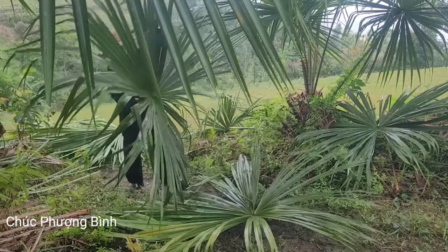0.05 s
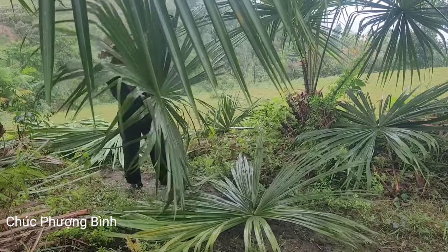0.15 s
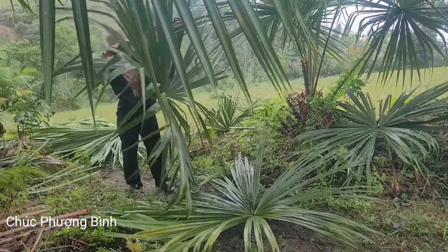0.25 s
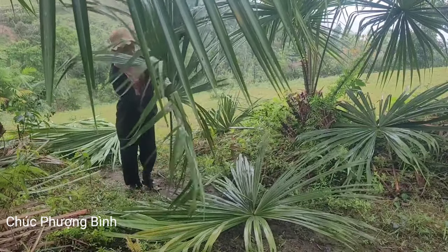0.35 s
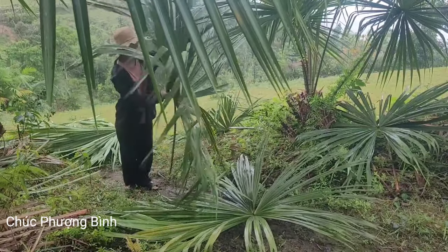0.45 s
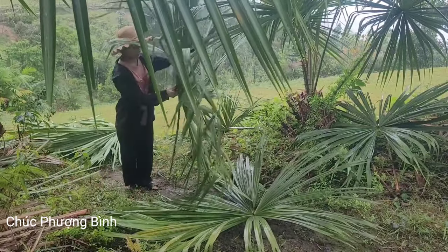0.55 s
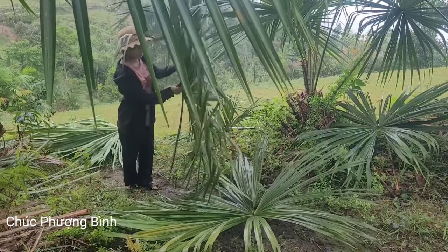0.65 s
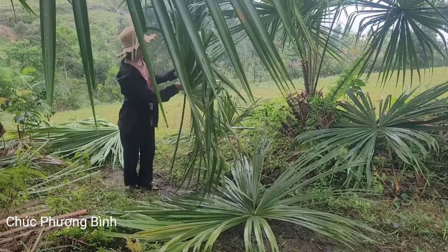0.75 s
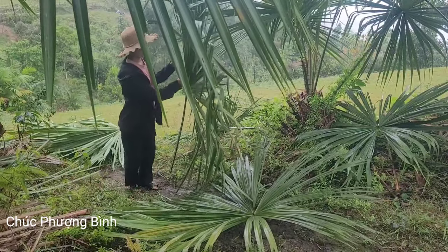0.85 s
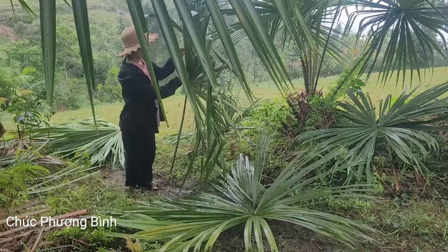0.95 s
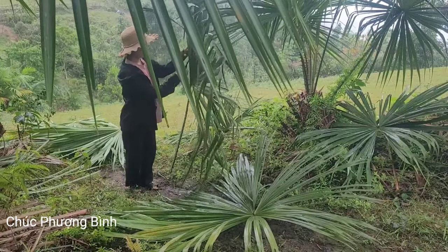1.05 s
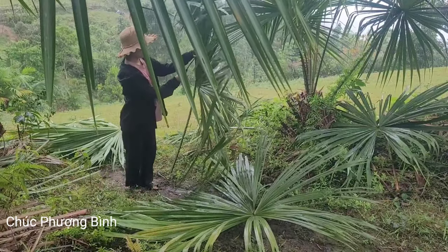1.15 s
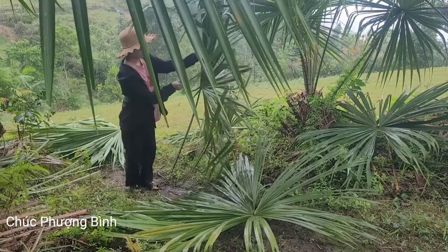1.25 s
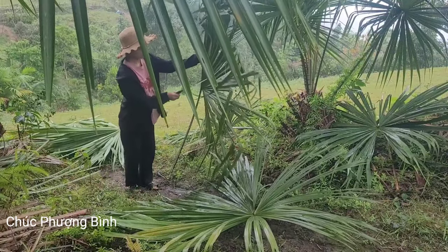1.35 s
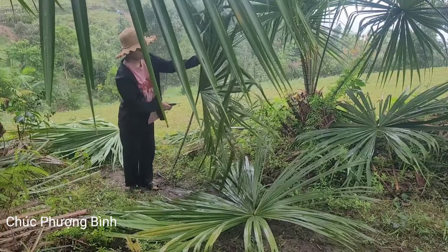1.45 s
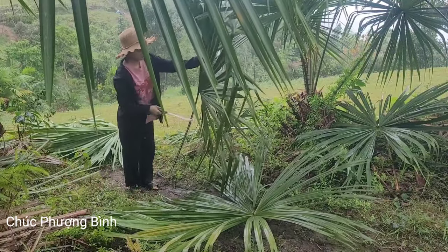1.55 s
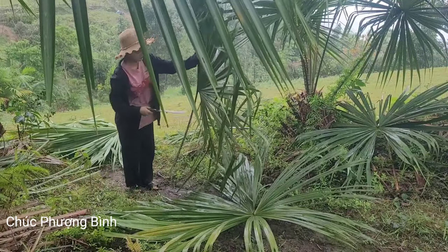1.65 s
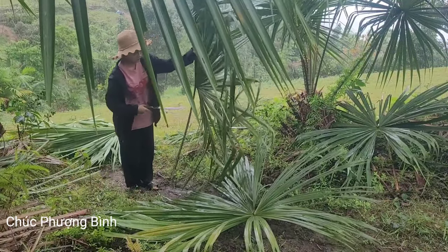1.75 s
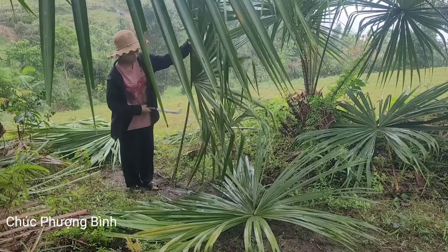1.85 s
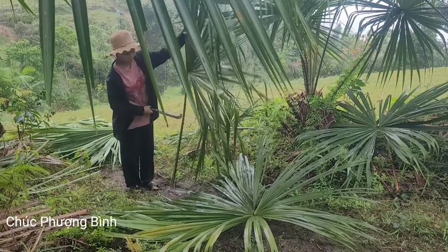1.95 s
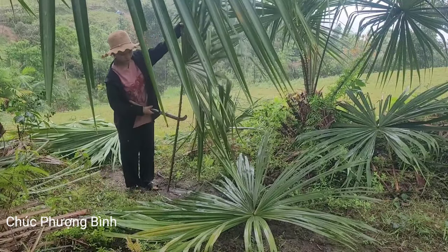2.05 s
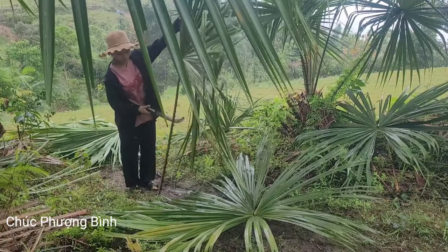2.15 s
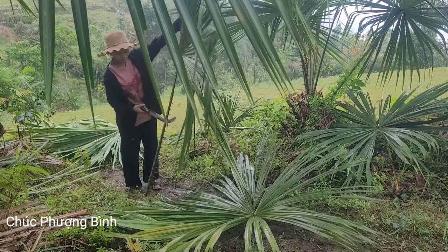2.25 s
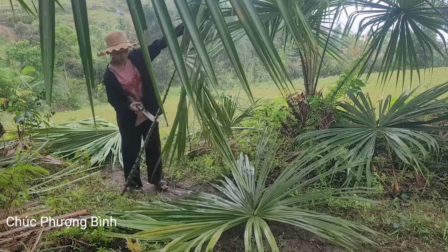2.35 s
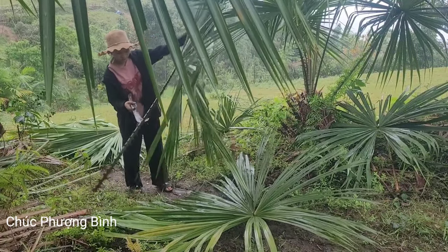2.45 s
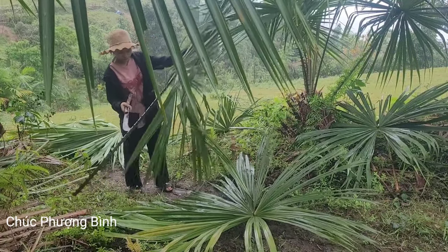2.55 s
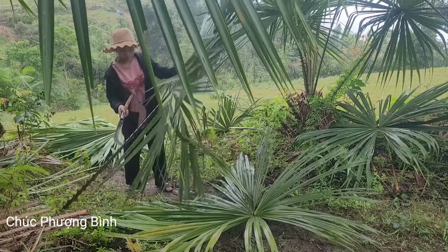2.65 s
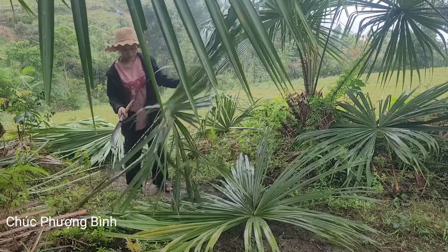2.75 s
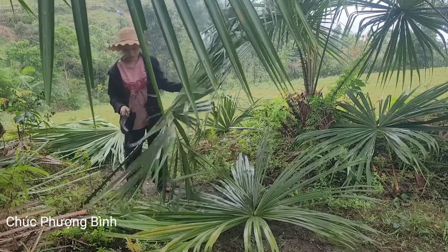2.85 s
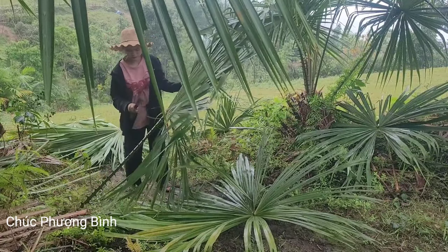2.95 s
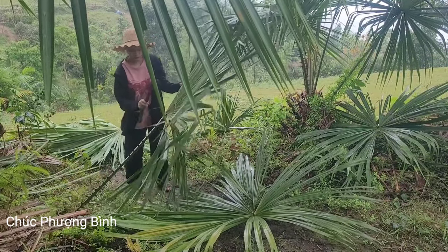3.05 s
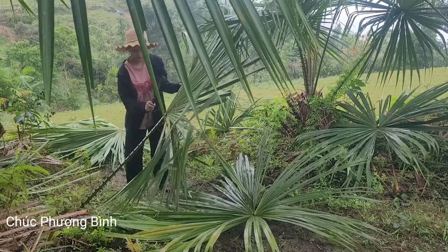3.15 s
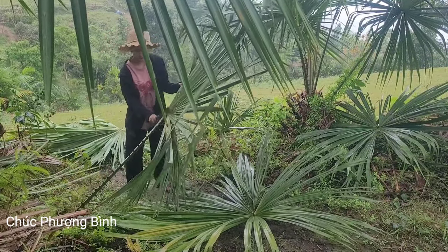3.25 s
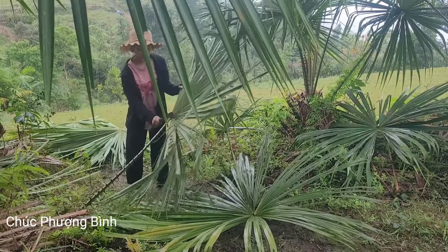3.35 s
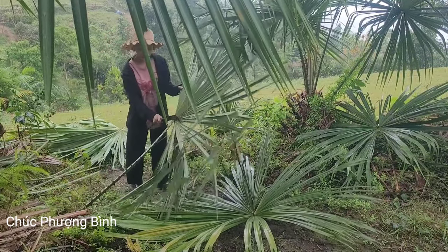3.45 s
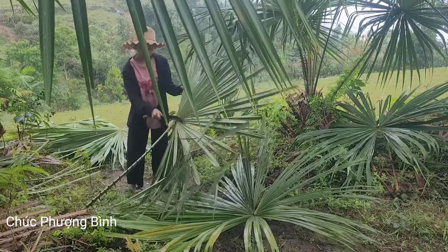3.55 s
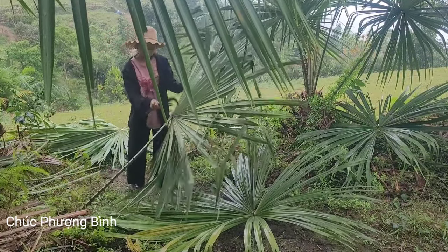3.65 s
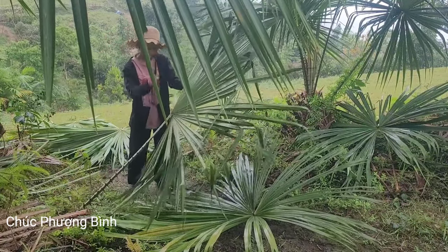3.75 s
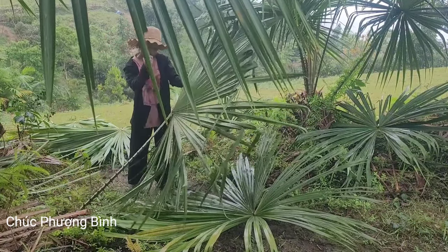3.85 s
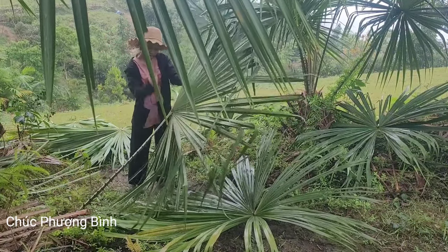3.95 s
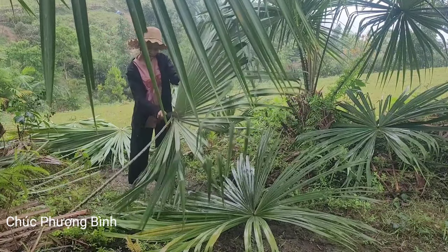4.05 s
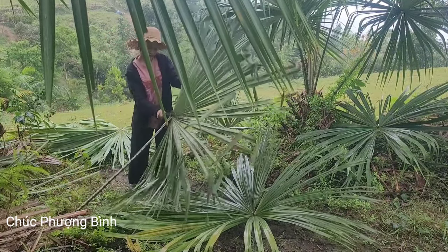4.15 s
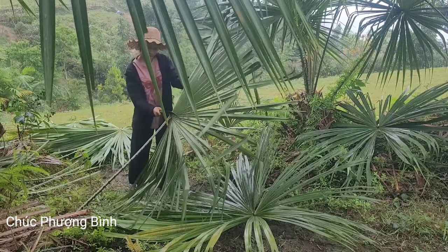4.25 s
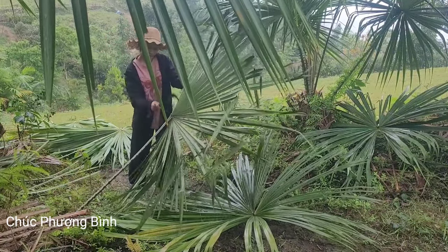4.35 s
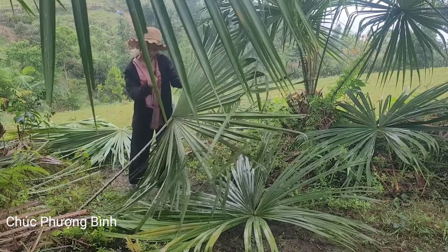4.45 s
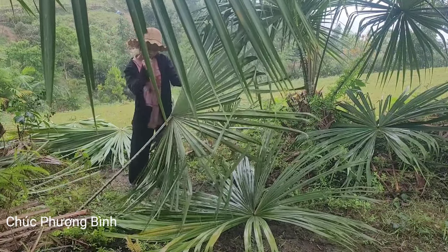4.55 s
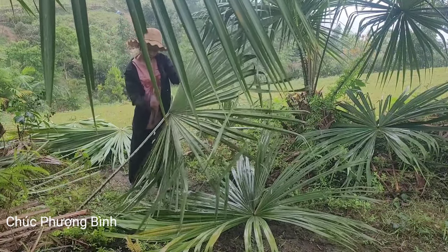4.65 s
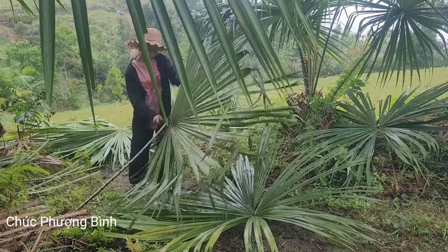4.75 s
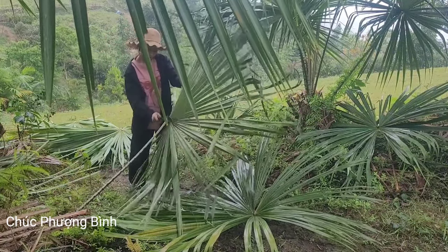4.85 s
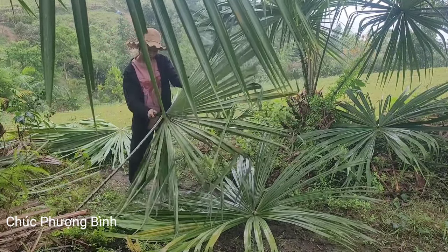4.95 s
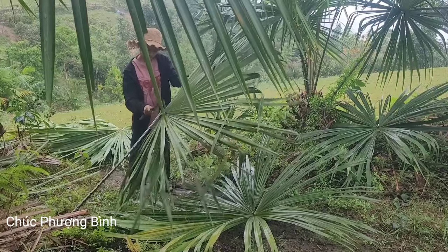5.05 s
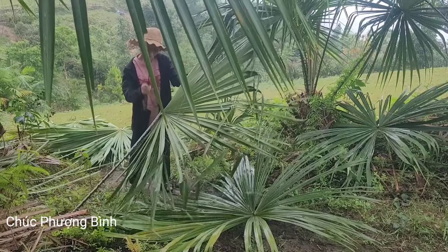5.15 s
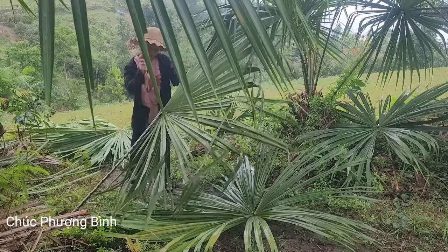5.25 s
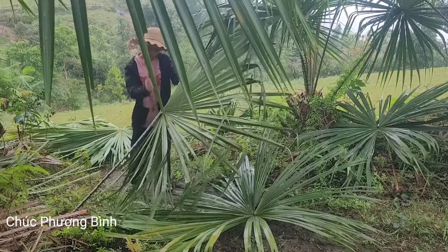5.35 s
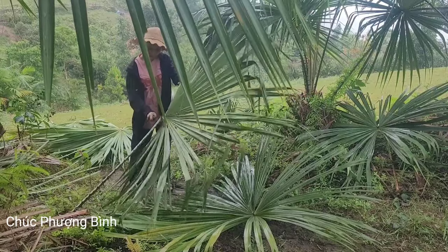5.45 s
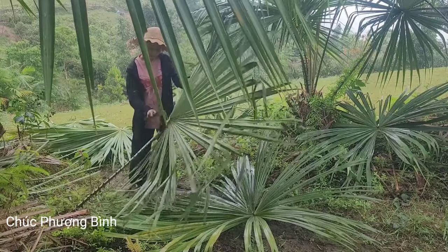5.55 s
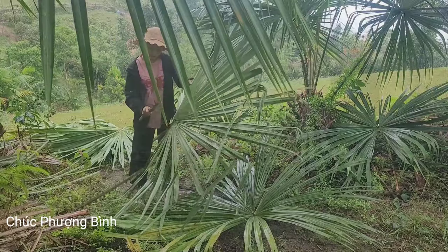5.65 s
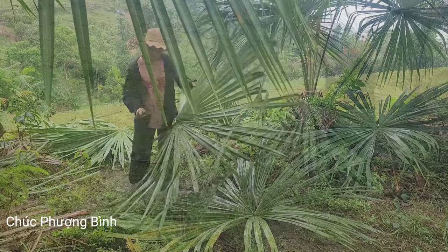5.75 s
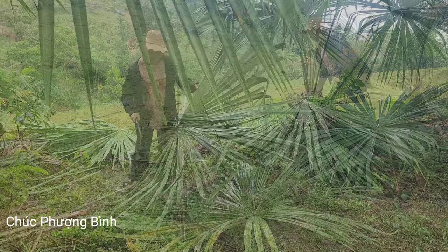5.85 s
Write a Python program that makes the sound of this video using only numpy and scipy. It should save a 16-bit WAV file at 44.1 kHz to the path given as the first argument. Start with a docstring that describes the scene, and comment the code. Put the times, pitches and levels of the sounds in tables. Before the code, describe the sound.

A close stereo outdoor scene in a grove, about six seconds long. A thin, steady hiss of distant insects and a very faint low wind run throughout. From 0.3 to 0.75 s stiff palm leaves slap lightly in a cluster, with tiny fibre ticks. Between 1 and 1.7 s come small dry stalk knocks and a swell of papery dragging, which then eases. Around 2.3-2.5 s a frond swishes quickly through the air with a bright hiss. At 2.8 s a crisp leafy slap and sharp snap lead into more rustling. A blade chops at 3.3 s, fairly lightly, with a rustle near 3.65 s, then hard and woody at 4.1 and 4.75 s, the latter with an immediate second knock. A softer, duller chop lands at 5.5 s. Leaves shiver after the blows, small ticks end near 5.8 s, and echoes are short and faint.

```python
"""Outdoors in a grove a blade chops stiff palm stalks; the big fronds slap, snap and rustle as they are handled.
Chops and knocks are short pushes and dying crackles that ring stalk, frond and leaves; fibres tick as they part.
Rustles are dense noise grains. A far insect chorus (narrow bands of hiss) and faint wind lie underneath.
Blows and leaves reach the left of two close microphone ports slightly first; the trees echo the blows."""
import sys
import numpy as np
from scipy import signal
from scipy.fft import rfft, irfft, next_fast_len
from scipy.io import wavfile
from scipy.ndimage import uniform_filter1d, map_coordinates

SR = 44100
rng = np.random.default_rng(int(sys.argv[2]) if len(sys.argv) > 2 else 0)


def output_pcm(signal):
    """Save a mono or channel-first signal as 16-bit PCM at the path in sys.argv[1].

    Samples are clipped to [-1, 1] before scaling.
    """
    pcm = np.clip(np.atleast_2d(signal).T, -1, 1) * 32767
    wavfile.write(sys.argv[1], SR, np.round(pcm).astype(np.int16))


N = 260631  # length in samples

# Blade blows: t/s, slap level/dB, thud level/dB, stalk level/dB, fizz level/dB,
# stalk f/Hz, frond f/Hz, stalk t60/s (time to fall by 60 dB)
BLADE_BLOWS = [(3.3262, -29, -32.5, -29, -27, 868, 375, .11),
               (4.0857, -19.5, -24.5, -15.5, -30.5, 710, 318, 0.12),
               (4.7486, -17.5, -26, -17.5, -23.5, 815, 200, 0.11),
               (5.482, -28.5, -31.5, -31.5, -28, 510, 264, 0.14)]
# Fronds knocking and slapping, and at 4.069 s the blade grazing leaves just before its blow: # t/s, slap
# level/dB, thud level/dB, stalk level/dB, fizz level/dB, stalk f/Hz, stalk t60/s
FROND_KNOCKS = [(0.2947, -45, -63, -47, -55, 520, 0.085), (0.5295, -34, -72, -41, -32.5, 553, 0.11),
                (0.5469, -30.5, -68, -56, -34.5, 576, 0.068), (0.5959, -40, -58, -51, -37, 1640, 0.067),
                (0.6144, -41.5, -65, -49.5, -42, 472, 0.086), (0.6603, -32.5, -72, -48, -36.5, 480, 0.059),
                (0.6726, -44, -69, -43.5, -47, 570, 0.094), (0.7464, -52, -66, -43.5, -54, 605, 0.091),
                (0.971, -39, -57, -36, -47.5, 674, 0.092), (1.187, -40, -73, -38, -46, 577, 0.075),
                (1.2104, -44, -55, -44, -51, 575, 0.053), (1.2481, -55, -58, -46.5, -51, 1550, 0.072),
                (1.3156, -40.5, -70, -55, -46.5, 510, 0.053), (1.3555, -49.5, -68, -47.5, -51, 1520, .09),
                (1.4246, -43, -53, -29.5, -60, 558, 0.069), (1.502, -39.5, -65, -39, -43.5, 1000, 0.067),
                (1.5764, -50, -57, -39.5, -48.5, 1410, 0.14), (1.6222, -42, -66, -45.5, -43.5, 1090, .12),
                (1.9794, -47.5, -85, -49.5, -49.5, 1730, .16), (2.1364, -52, -83, -39, -57, 1140, 0.06),
                (2.262, -37, -81, -47, -30.5, 584, 0.071), (2.277, -48, -65, -43.5, -52, 244, .15),
                (2.317, -64, -54, -49.5, -45, 626, .13), (2.724, -50, -61, -45, -50, 890, 0.13),
                (2.7934, -28.5, -48, -39, -22, 1390, 0.093), (2.818, -45, -47.5, -35.5, -52, 704, 0.086),
                (2.9885, -53, -53.5, -40.5, -52, 613, 0.081), (3.5029, -42, -60, -40.5, -42.5, 805, 0.067),
                (3.5776, -44, -70, -39.5, -53, 447, 0.0635), (3.677, -38, -70, -42.5, -47, 547, 0.087),
                (4.069, -38.5, -63, -46.5, -42, 860, 0.09), (4.134, -37.5, -38, -36.5, -38, 555, 0.24),
                (4.174, -53, -37.5, -50, -50, 480, 0.088), (4.2497, -39, -53, -44, -31.5, 950, 0.074),
                (4.2529, -62, -65, -36, -62, 940, 0.041), (4.337, -51, -74, -41.5, -49, 1150, 0.041),
                (4.3748, -41.5, -68, -52, -38.5, 1012, 0.07),
                (4.7675, -26.5, -29.5, -18.5, -28.5, 539, 0.069), (4.847, -63, -47, -42, -46, 1400, 0.049),
                (4.934, -53, -54, -41, -55, 514, .035), (5.0686, -57, -67, -51, -57, 600, .045),
                (5.1686, -47, -76, -51, -49.5, 1790, 0.062), (5.783, -55, -63, -44.5, -52, 700, 0.072),
                (5.8099, -44, -65, -51, -34, 1074, 0.067), (5.821, -48, -44.5, -46.5, -47, 610, 0.098)]

LEFT_LEADS_S = 2.9 / SR  # the left port hears blows and leaves this much earlier


def amp(db):
    """dB to gain."""
    return 10 ** (np.asarray(db) / 20)


def unit(x):
    """Scale to rms 1."""
    return x / np.sqrt(np.mean(x ** 2) + 1e-20)


def along(points, hz):
    """Read a curve of (f/Hz, value) points on a log frequency axis."""
    f, value = np.transpose(points)
    return np.interp(np.log(hz + 1), np.log(f + 1), value)


def curves(rows):
    """Give one value per sample for each column after the time."""
    s, *columns = np.transpose(rows)
    return [np.interp(np.arange(N) / SR, s, column) for column in columns]


def wobble(rate):
    """A smooth random curve with this many random points a second."""
    points = rng.standard_normal(int(N * rate / SR) + 4)
    return map_coordinates(points, [np.arange(N) * rate / SR])


def bump(centre_s, spread_s):
    """A bell-shaped swell that peaks at 1."""
    return np.exp(-.5 * ((np.arange(N) / SR - centre_s) / spread_s) ** 2)


def filtered(x, response):
    """Filter x by a response over frequency, scaled so that white noise keeps its rms."""
    n = x.shape[-1]
    m = next_fast_len(n + SR // 10)
    gain = response(np.fft.rfftfreq(m, 1 / SR))
    gain = gain / np.sqrt(np.mean(np.abs(gain) ** 2))
    return irfft(rfft(x, m) * gain, m)[..., :n]


def ringing(modes, order=1):
    """Resonances (f/Hz, width/Hz, level/dB) that ring after a push; order 2 passes the sound through twice."""
    def response(f):
        total = 0
        for k, (centre, width, db) in enumerate(modes):
            resonance = 1j * f * width / (centre ** 2 - f ** 2 + 1j * f * width)
            total = total + (-1) ** k * amp(db) * resonance
        return total ** order
    return response


def crackle(rate, spiky_db):
    """Two noises of rms 1 broken into the same grains: fibres give way in small uneven jerks."""
    grains = amp(spiky_db * wobble(rate))
    return unit(grains * rng.standard_normal((2, N)))


def ports(pair, likeness):
    """Two unrelated signals become left and right, as alike as the (f/Hz, likeness) curve, the right one late."""
    def response(hz):
        turn = np.arccos(np.clip(along(likeness, hz), -1, 1)) / 2
        return np.array([np.cos(turn), np.sin(turn)])

    def delay(hz):
        return np.exp(np.outer([1j, -1j], np.pi * LEFT_LEADS_S * hz))

    shared, apart = filtered(pair, response)
    return filtered(np.array([shared + apart, shared - apart]), delay) / np.sqrt(2)


def insects():
    """Many far singers blend into narrow bands of hiss that waver a little."""
    # Loudness of the chorus: t/s, level/dB
    chorus_level = [(0.0, -58), (1.61, -56.5), (1.86, -58), (2.42, -55.5), (5.91, -57.5)]
    # Bands the insects sing in: f/Hz, width/Hz, level/dB (before passing twice)
    song_bands = [(4170, 820, 0), (5150, 560, -4.5), (7440, 600, -4)]
    level_db, = curves(chorus_level)
    hiss = amp(level_db + 0.41 * wobble(4.36)) * crackle(55, spiky_db=1.5)
    return filtered(hiss, ringing(song_bands, order=2))


def wind():
    """A faint low buffeting in slow gusts, different at each port, over the air's steady rumble."""
    # Far rumble of the air: f/Hz, width/Hz, level/dB (before passing twice)
    rumble_bands = [(89, 100, 0.5), (177, 130, -0.5)]
    wind_db, gusty_db, air_db = -82.5, 1.5, -84
    lumps = crackle(12, spiky_db=4.5)
    gusts = amp(wind_db + gusty_db * wobble(1.56))
    buffet = filtered(gusts * lumps, ringing([(48, 19, 0)], order=2))
    # one noise for both ports
    rumble = filtered(rng.standard_normal(N), ringing(rumble_bands, order=2))
    return buffet + amp(air_db) * rumble


def shakes():
    """A hard slap leaves the frond shaking: the shake swells, then dies."""
    over_db = -29  # only slaps above this shake the frond
    base_db, db_per_slap_db = -52, 0.42  # shake after a slap at over_db, and its growth with harder slaps
    peak_s, fall_db_per_s = 0.13, 58
    t, power = np.arange(N) / SR, np.zeros(N)
    for s, slap_db, *_ in [*BLADE_BLOWS, *FROND_KNOCKS]:
        if slap_db > over_db:
            since = np.maximum(t - s, 0)
            swell = np.minimum(since / peak_s, 1) ** 3
            peak_db = base_db + db_per_slap_db * (slap_db - over_db)
            power += (swell * amp(peak_db - fall_db_per_s * np.maximum(since - peak_s, 0))) ** 2
    return np.sqrt(power)


def patchy(x, depth_db):
    """Short patches of random gain in time and pitch: each leaf that drags has its own colour."""
    z = signal.stft(x, nperseg=512)[2]
    field = rng.standard_normal(z.shape[1:])
    field = uniform_filter1d(field, size=4, axis=0)
    field = uniform_filter1d(field, size=5, axis=1)
    patched = signal.istft(z * amp(depth_db * unit(field)), nperseg=512)[1]
    return unit(patched[:, :N])


def edge_hiss(sweep, centre_s, spread_s):
    """Air hisses past the leaf edges in a quick sweep, shifting in pitch; then one last tip whistles."""
    # Edge tones early in the sweep: f/Hz, width/Hz, level/dB (before passing twice)
    early = [(5040, 3700, -5.5), (7300, 1100, 1.5), (11100, 2600, -0.5)]
    pitch_rise = 1.15  # pitch late in the sweep, as a multiple
    late = [(hz * pitch_rise, width, db) for hz, width, db in early]
    hiss = amp(-36.5) * sweep * crackle(250, spiky_db=1.5)
    # crossfade from early to late tones
    share = np.clip(.5 + (np.arange(N) / SR - centre_s) / (3 * spread_s), 0, 1)
    edges = filtered(hiss * np.sqrt(1 - share), ringing(early, order=2))
    edges = edges + filtered(hiss * np.sqrt(share), ringing(late, order=2))
    wisp = amp(-52.5) * bump(2.482, .014) * crackle(250, spiky_db=0.0)
    return edges + filtered(wisp, ringing([(9150, 700, 0)], order=2))


def rustle():
    """Leaves drag over each other: dense grains whose strength flutters, and one frond sweeps through the air."""
    # Leaf blades dragging in the hands: t/s, broad leaf level/dB, dry tip level/dB
    dragging = [(0.0, -62, -59), (0.45, -60, -55.5), (0.94, -56, -60.5), (1.09, -61, -60.5),
                (1.36, -51.5, -53.5), (1.51, -50.5, -52), (1.71, -55.5, -56), (1.96, -58.5, -58.5),
                (2.3, -62, -59), (2.47, -59.5, -60), (2.68, -50.5, -52.5), (3.14, -59.5, -56.5),
                (3.42, -61, -65), (3.64, -50.5, -49.5), (3.87, -53.5, -54.5), (4.07, -62, -62),
                (4.5, -54.5, -56.5), (4.74, -64.5, -65.5), (5.2, -56, -54), (5.5, -64, -66.5),
                (5.65, -59, -62), (5.91, -60, -59)]
    # Colour of the broad leaves: f/Hz, relative level/dB
    broad_colour = [(250, -33), (450, 0), (600, -2), (1000, -3.5), (2000, -4), (3500, -5.5), (6000, -7.5),
                    (9000, -25)]
    # Colour of the dry tips: f/Hz, relative level/dB
    tip_colour = [(1500, -15), (3500, 3), (6000, -1.5), (8000, 1), (9000, -4), (12500, 0), (15500, -4.5)]
    # Stalks swaying in the hand: f/Hz, width/Hz, level/dB (before passing twice)
    sway_modes = [(59.3, 39, -6.5), (127, 49, -2), (204.4, 81, -1.5), (320.4, 91, 1)]
    # How alike left and right are: f/Hz, likeness (1 = same)
    rustle_likeness = [(60, 0.46), (400, 0.91), (1500, 0.7), (4000, 0.081), (12000, 0.073)]
    sweep_s, sweep_spread_s = 2.415, .034
    # levels against the broad leaves
    shake_tips_db, shake_sway_db, hand_sway_db = -1, -14.5, -21

    broad_db, tips_db = curves(dragging)
    shake = shakes()
    sweep = bump(sweep_s, sweep_spread_s)
    flutter = amp(1.4 * wobble(25))

    broad = np.hypot(amp(broad_db), shake) * flutter * amp(1.48 * wobble(70))
    broad = broad + amp(-43.5) * sweep
    broad = broad * patchy(crackle(400, spiky_db=0.5), depth_db=3)
    tips = np.hypot(amp(tips_db), amp(shake_tips_db) * shake) * flutter
    tips = tips * crackle(1200, spiky_db=0.5)
    sway = np.hypot(amp(broad_db + hand_sway_db), amp(shake_sway_db) * shake) * flutter
    sway = sway * crackle(60, spiky_db=3.0)

    leaves = filtered(broad, lambda hz: amp(along(broad_colour, hz)))
    leaves = leaves + filtered(tips, lambda hz: amp(along(tip_colour, hz)))
    leaves = leaves + filtered(sway, ringing(sway_modes, order=2))
    return ports(leaves + edge_hiss(sweep, sweep_s, sweep_spread_s), rustle_likeness)


def contacts(rows, blow_db, knock_db, woody_db, leafy_db, thud_lasts, after_db):
    """Each contact is a push, then a dying crackle, in the frond, the stalk, the leaf sheets and the tips."""
    # Ringing stalk: f as a multiple of its pitch, width likewise, level/dB
    stalk_modes = [(.62, 0.18, -3.5), (1.008, 0.14, 1.5), (1.552, 0.69, -8), (2.2, 0.54, -8), (3.1, 1, -13)]
    # Whole frond flexing: f as a multiple of its pitch, width likewise, level/dB
    frond_modes = [(.19, 0.15, -13), (.45, 0.24, -5.5), (1.01, 0.21, 1.5), (1.6, 0.39, -18)]
    # Slapping leaf sheets: f/Hz, width/Hz, level/dB (before passing twice)
    sheet_modes = [(2140, 2230, 4.5), (5530, 3860, 6)]
    # Fizzing fibres and tips: f/Hz, width/Hz, level/dB (before passing twice)
    fibre_modes = [(7060, 2350, 0.5), (13200, 6500, 1)]
    # How alike left and right are: f/Hz, likeness (1 = same)
    contact_likeness = [(60, 0.96), (400, 0.96), (1500, 0.78), (4000, 0.17), (12000, 0.29)]
    slap_lasts, fizz_lasts = 1.02, 1.17  # multiples of the stalk's t60
    # a contact with this t60 pushes at the given strength; shorter ones knock harder, longer ones scrape
    crisp_s, crisp_power = 0.068, 1.13

    slap, fizz, wood = np.zeros((3, 2, N + SR))
    woody, leafy = (np.pad(crackle(900, db), ((0, 0), (0, SR))) for db in (woody_db, leafy_db))
    for s, slap_db, thud_db, stalk_db, fizz_db, stalk_hz, thud_hz, t60, rise_s in rows:
        t = np.arange(round(SR * min(.5, 4 * t60))) / SR
        here = slice(round(s * SR), round(s * SR) + len(t))
        # one click, in the first signal only: the part both ports share
        click = np.arange(len(t)) == round(rise_s * SR)
        push = np.outer([1, 0], click) * (crisp_s / t60) ** crisp_power

        def strike(db, lasts, grains, push_db):
            """A quick decay, with a quieter and slower one after it, and the push."""
            dying = amp(-60 * t / lasts) + amp(after_db - 60 * t / (2.7 * lasts))
            rising = 1 - np.exp(-t / rise_s)
            return amp(db) * (dying * rising * grains[:, here] - amp(push_db) * push)

        slap[:, here] += strike(slap_db, slap_lasts * t60, leafy, blow_db)
        fizz[:, here] += strike(fizz_db, fizz_lasts * t60, leafy, blow_db)
        # the free lengths of stalk and frond set their pitches
        stalk = ringing([(stalk_hz * k, stalk_hz * w, db) for k, w, db in stalk_modes])
        frond = ringing([(thud_hz * k, thud_hz * w, db) for k, w, db in frond_modes])
        knock = strike(stalk_db, t60, woody, knock_db)
        wood[:, here] += filtered(knock, lambda hz: stalk(hz) * 1j * hz / (0.62 * stalk_hz + 1j * hz))
        # a heavy frond cannot flex fast, so its treble is weak
        thud = strike(thud_db, thud_lasts * t60, woody, knock_db)
        wood[:, here] += filtered(thud, lambda hz: frond(hz) / (1 + 1j * hz / 450))
    leaves = filtered(slap, ringing(sheet_modes, order=2)) + filtered(fizz, ringing(fibre_modes, order=2))
    return ports((leaves + wood)[:, :N], contact_likeness)


def fronds():
    """Fronds knock and slap; heavier thuds move more frond and sound lower."""
    light_hz, light_db, db_per_octave = 397, -57.5, 56.5  # a light thud's pitch and level
    rise_share = 0.0337  # rise time as a share of the stalk's t60
    rows = []
    for *row, t60 in FROND_KNOCKS:
        thud_hz = light_hz * 2 ** ((light_db - row[2]) / db_per_octave)
        rows.append((*row, thud_hz, t60, rise_share * t60))
    return contacts(rows, blow_db=14.0, knock_db=18.5, woody_db=3.5, leafy_db=2.0,
                    thud_lasts=1.11, after_db=-17.5)


def grove(x):
    """Trunks and fronds scatter each sound back, every frequency dying at its own speed."""
    # Echoes off the trees: f/Hz, t60/s
    echo_t60 = [(150, 0.081), (1000, 0.4), (4000, 0.41), (12000, 0.3)]
    hz, t, z = signal.stft(rng.standard_normal((2, SR // 2)), SR, nperseg=256)
    decay = amp(-60 * t / along(echo_t60, hz)[:, None])
    tail = signal.istft(z * decay, SR, nperseg=256)[1]
    delayed = np.pad(x, ((0, 0), (600, 0)))  # samples before the first echo
    return signal.fftconvolve(delayed, tail / np.linalg.norm(tail[0]), axes=1)[:, :N]


def snaps():
    """A dry fibre parts in an instant: a cycle or two at its own pitch."""
    # Single fibres snapping: t/s, level/dB, f/Hz, left over right/dB
    fibres = [(0.545, -23, 5000, -4), (0.5975, -26.5, 5150, -6), (0.6617, -35, 2960, 4),
              (1.2476, -36, 2900, -1), (1.6913, -38, 4400, 4), (2.794, -10, 12700, 6),
              (2.804, -16, 6500, 14.5), (3.5023, -35, 4170, -4), (4.2534, -33, 9430, -1),
              (4.3382, -37, 2580, -3), (4.377, -30.5, 9300, 14)]
    out = np.zeros((2, N + SR))
    t = np.arange(-SR // 1000, SR // 1000) / SR
    port_t = t - np.array([[0], [LEFT_LEADS_S]])
    for s, db, hz, pan_db in fibres:
        tick = np.sin(2 * np.pi * hz * port_t) * np.exp(-(0.4 * hz * port_t) ** 2)
        level = amp(db + pan_db * np.array([[.5], [-.5]]))
        out[:, round(s * SR):][:, :len(t)] += level * tick
    return out[:, :N]


def chops():
    """A blade strikes stiff stalks: a hard push with a short fixed rise."""
    rise_s = 0.001075
    rows = [(*row, rise_s) for row in BLADE_BLOWS]
    return contacts(rows, blow_db=22, knock_db=29, woody_db=0.5, leafy_db=-2,
                    thud_lasts=1.2, after_db=-22.5)


def scene():
    """Blade, fronds, their echoes and the living background."""
    hits = fronds() + snaps() + chops()
    echoes = amp(-20) * grove(hits)
    return insects() + wind() + rustle() + hits + echoes


def record(dry):
    """The microphone dulls the very top and nothing passes above the band limit."""
    shelf_hz, shelf_db, top_hz = 15650, -28, 16800
    m = next_fast_len(N + SR // 2)
    hz = np.fft.rfftfreq(m, 1 / SR)
    gain = np.where(hz < shelf_hz, 1, amp(shelf_db)) * (hz < top_hz)
    return irfft(rfft(dry, m) * gain, m)[:, :N]


dry = scene()
out = record(dry)
output_pcm(out)
```